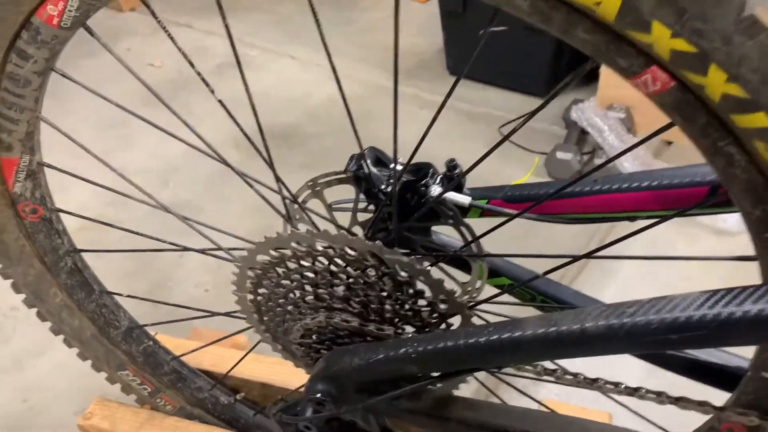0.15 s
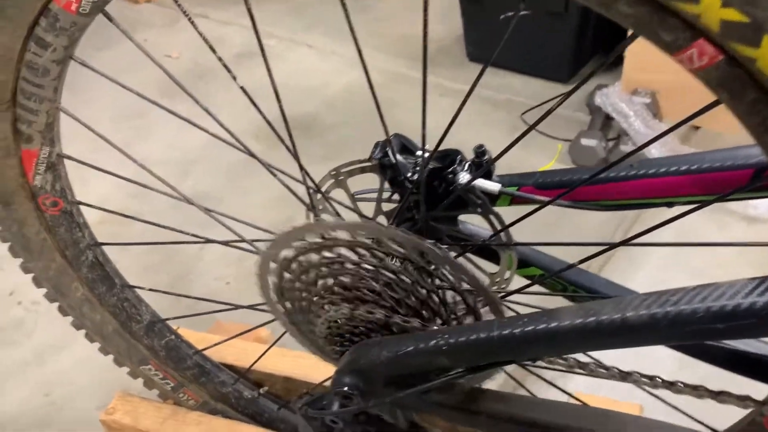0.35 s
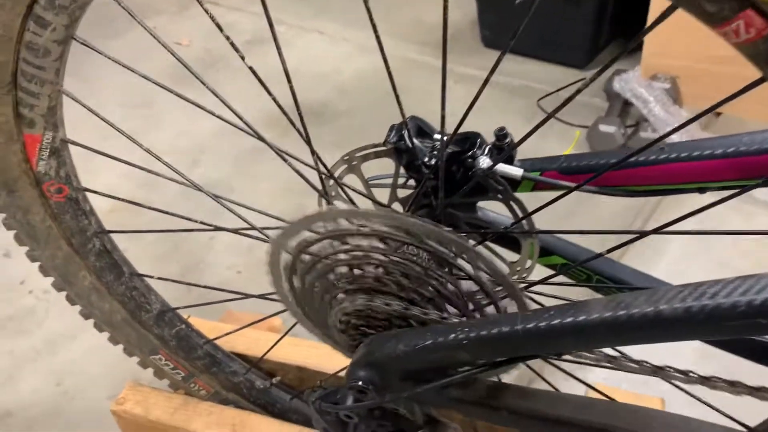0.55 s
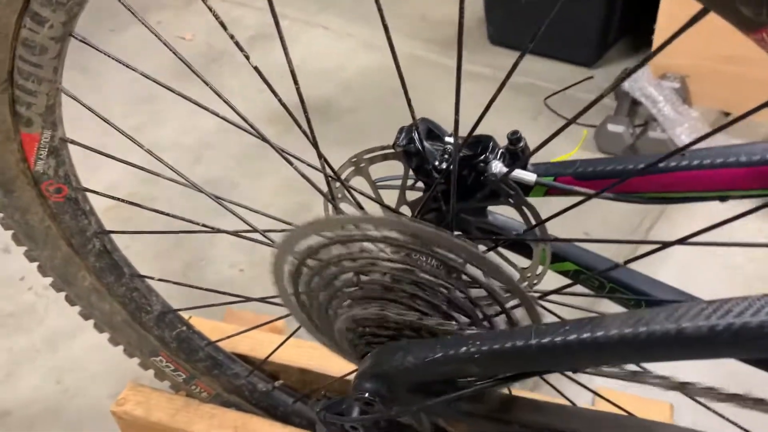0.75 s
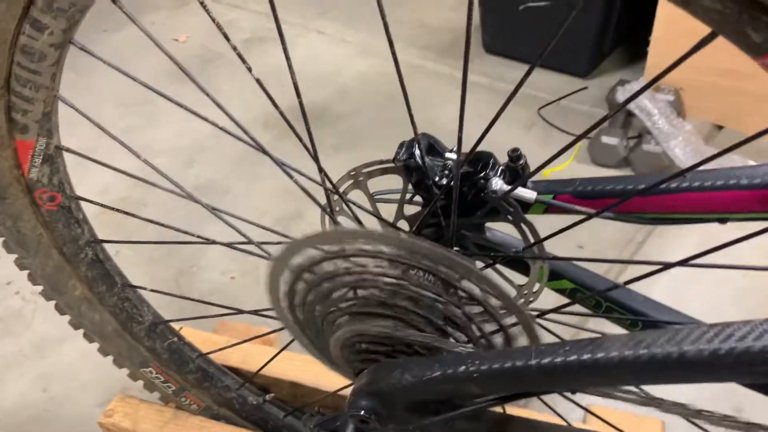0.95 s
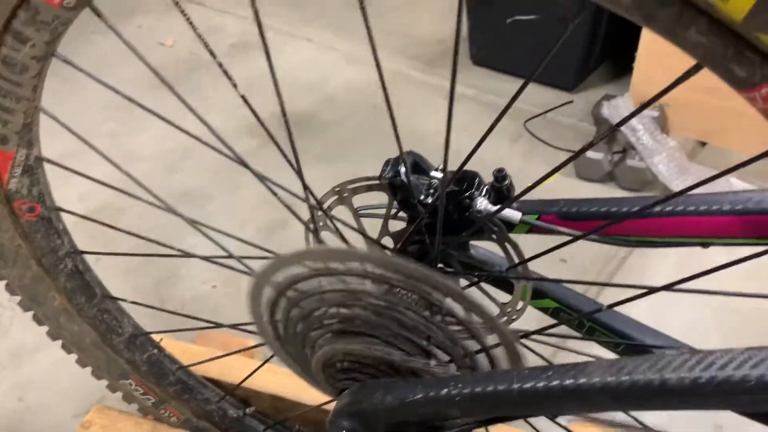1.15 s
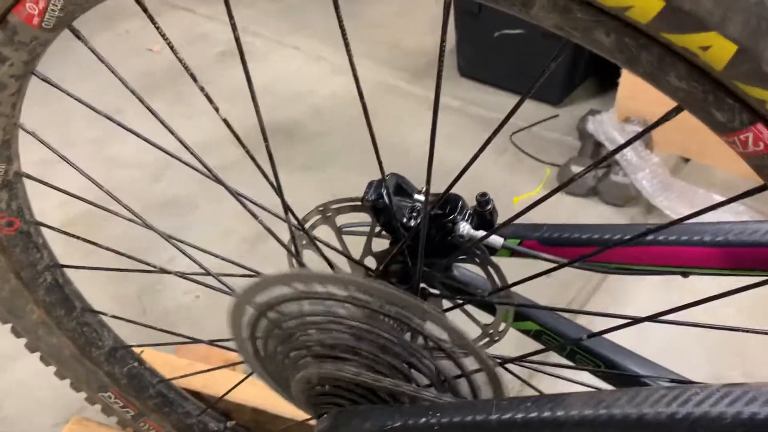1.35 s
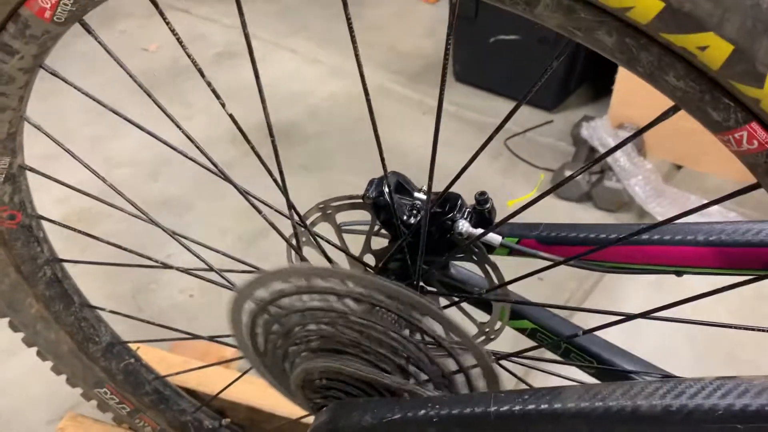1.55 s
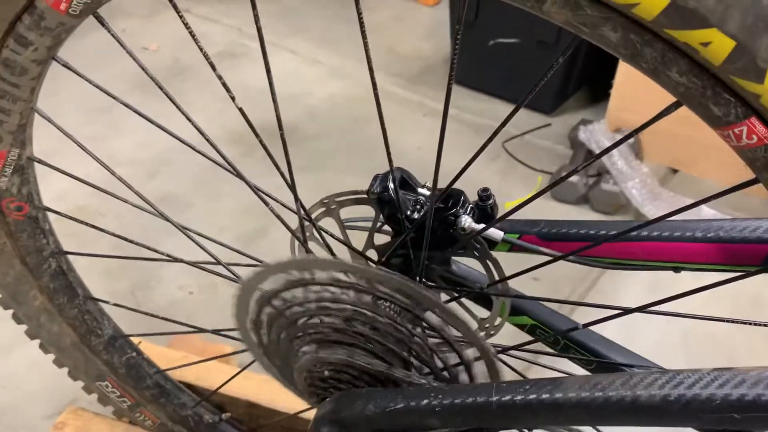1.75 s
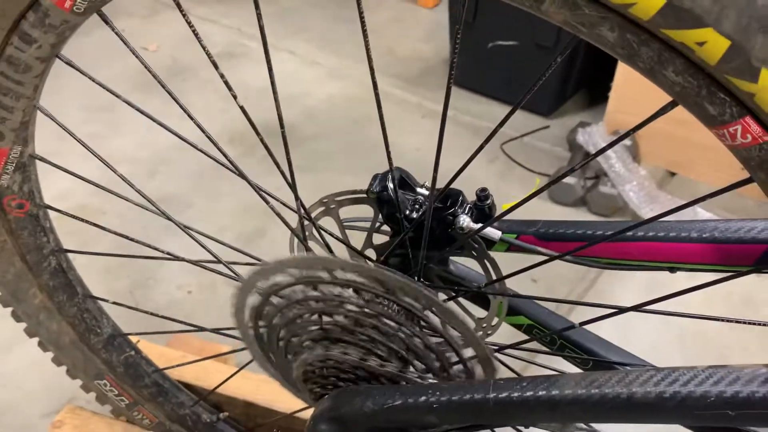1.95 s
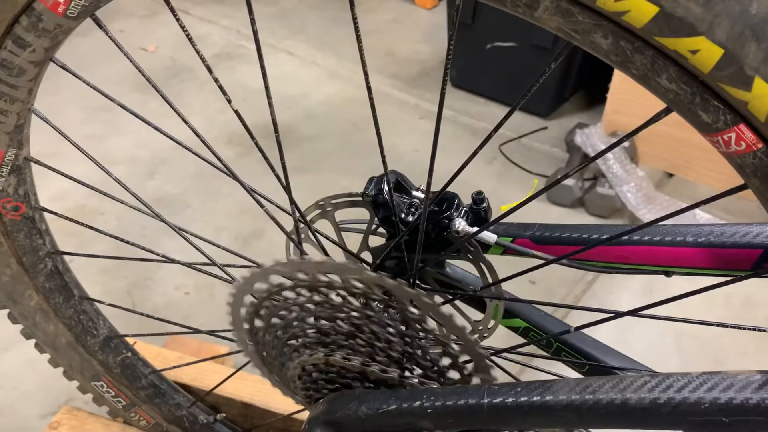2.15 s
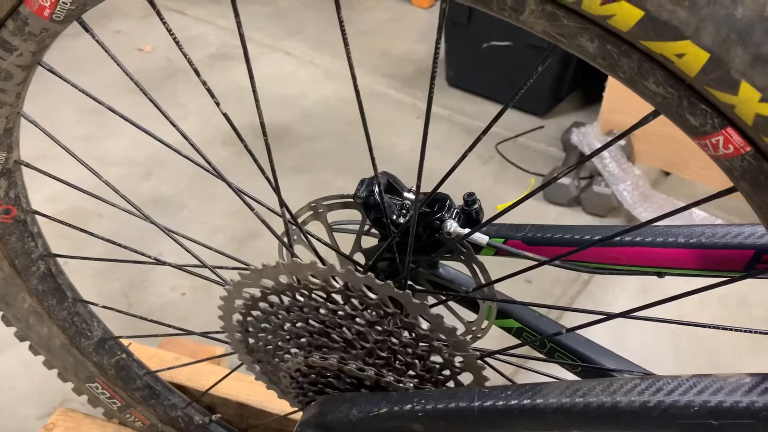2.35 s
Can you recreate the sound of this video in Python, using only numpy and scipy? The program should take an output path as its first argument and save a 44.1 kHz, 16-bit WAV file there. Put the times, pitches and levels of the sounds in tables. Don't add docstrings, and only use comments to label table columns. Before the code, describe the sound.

Close stereo phone pickup of a bike's rear hub: sprung pawls click over ratchet teeth, racing into a ringing metallic whirr while the chain rumbles softly, then slowing click by click over faint workshop room tone.

```python
import sys
import numpy as np
from scipy import signal
from scipy.fft import rfft, irfft, next_fast_len
from scipy.io import wavfile
from scipy.ndimage import uniform_filter1d

SR = 44100
rng = np.random.default_rng(int(sys.argv[2]) if len(sys.argv) > 2 else 0)


def to_wav(sig):
    pcm = np.clip(np.atleast_2d(sig), -1, 1) * 32767
    pcm = np.round(pcm).astype(np.int16)
    wavfile.write(sys.argv[1], SR, pcm.T)


def nominal_scale(level):
    x = np.asarray(level, float) / 20
    return 10 ** x


N = 105840
T = np.arange(N) / SR
SIZE = next_fast_len(N + SR)
HZ = np.arange(SIZE // 2 + 1) * SR / SIZE + 1e-3
LEFT_RIGHT = np.array([[.5], [-.5]])

# pitch_hz, level_db (per Hz)
ROOM_EARLY = [(24, -54), (40, -12), (276, -11), (351, -17.5), (701, -6.5), (1540, -22), (2000, -3),
              (2540, -17.5), (3500, -24), (12000, -44), (15600, -98), (22000, -120)]
# pitch_hz, level_db (per Hz)
ROOM_LATE = [(24, -25.5), (40, -3), (135, -22), (172, -19), (425, -5), (1160, -26.5), (2100, -9),
             (2700, -27), (3800, -17), (4200, -26), (12000, -56.5), (15600, -81.5), (22000, -120)]
# pitch_hz, early_level_db, late_level_db
MAINS_HUM = [
    (58.7, -60.5, -66),
    (109.6, -68, -68.5),
    (683, -82, -85.5),
]
# time_s, level_db
CHAIN_PULL = [(0.1, -66.5), (0.23, -61.5), (0.37, -70), (0.41, -53.5), (0.49, -61), (0.54, -52.5),
              (0.58, -62.5), (0.79, -54), (0.81, -48), (0.85, -50), (1.02, -44.5), (1.43, -48), (1.45, -50),
              (1.53, -51), (1.56, -51.5), (2.15, -74)]
# pitch_hz, width_hz, level_db
FRAME_MODES = [
    (59.3, 28, -6.5),
    (128.6, 22, -7.5),
    (166.9, 15.5, -4.5),
    (229, 57, -10.5),
    (318.5, 117, -7),
    (497, 240, -5.5),
    (798, 200, -6.5),
    (1300, 290, -5.5),
]
# start_s, level_db (against the buzz's start)
STARTING_TICKS = [(0.0907, -11), (0.096, -10.5), (0.138, -4.5), (0.1623, -5), (0.179, -3), (0.1967, -1),
                  (.2072, 2.5), (0.22, -6.5), (0.2286, 3.5), (0.2385, -3.5), (0.2478, 0.5)]
# start_s, level_db (against the buzz's end)
STOPPING_TICKS = [(1.9552, -3), (1.963, -3), (1.9695, 0), (1.977, 0.5), (1.986, -3), (1.9925, 0.5),
                  (2.0038, -3), (2.012, 1), (2.0241, -4.5), (2.0315, 0.5), (2.0426, -2), (2.0544, 0.5),
                  (2.0686, -2.5), (2.0811, -3.5), (2.095, -2), (2.1112, -1.5), (2.131, -6.5), (2.1551, -4),
                  (2.1863, -5.5)]
# time_s, speed_teeth_per_s
TOOTH_SPEED = [(.22, 96), (.36, 200), (.49, 214), (.55, 238), (.61, 288), (.67, 265), (.765, 308),
               (.9, 356), (1.0, 920), (1.12, 775), (1.19, 708), (1.23, 642), (1.3, 600), (1.37, 550),
               (1.43, 502), (1.6, 385), (1.732, 288), (2.045, 88)]
# time_s, level_db
BUZZ_LEVEL = [(0.22, -30.5), (.45, -26), (0.632, -24), (0.852, -23.5), (0.988, -19.5), (1.01, -22.5),
              (1.2, -22.5), (1.24, -22), (1.38, -23.5), (1.43, -21.5), (1.455, -24.5), (1.6, -26),
              (1.922, -30), (2.05, -34)]
# pitch_hz, level_db
SNAP_COLOUR = [
    (1500, -39),
    (2600, -14),
    (3800, -11.5),
    (5800, -14.5),
    (8000, -1.5),
    (10000, -7),
    (12500, -6),
    (15500, -4.5),
]
# pitch_hz, level_db, t60_s
WHEEL_RING = [(296, -56, .3), (650, -24.5, 0.27), (900, -16, 0.74), (1310, -26, 0.12), (1650, -21.5, 0.13),
              (1940, -18, 0.29), (2246, -8, 0.55), (2700, -4.5, 0.23), (2915, -10.5, 0.52),
              (3385, -24, 0.19), (3920, -13, .2), (4290, -13.5, 0.17), (6550, -20.5, 0.28),
              (8180, -43.5, 0.34), (15600, -59, 0.13)]
# pitch_hz, level_db, t60_s
COG_MODES = [(2214, -8, .12), (2480, -7, .1), (2717, -7, .1), (2600, -6, .04), (3005, -1, .16),
             (4440, -7, .02), (5975, -17, .05), (6750, -4, .03), (7750, 0, .008), (9260, -5, .07),
             (9530, -7, .05), (10550, -1, .008), (11910, -11, .03), (11500, -11, .03), (14600, -13, .03),
             (15430, -7, .05), (10800, -11, .03), (15600, -12, .08), (1993, -15, .1), (3160, -12, .1)]
# pitch_hz, level_db, t60_s
SPOKE_MODES = [(2892, -4, 1.2), (3428, -8, 1.6), (2202, -6, .6), (2110, -6, .4), (1530, -1, .06),
               (750, -12, .15), (900, -12, .12), (1050, -9, .1), (3811, -12, .4), (5975, -17, .4),
               (6720, -9, .3)]

ROOM_EARLY_DB, ROOM_LATE_DB, ROOM_SIDE_DB = -53, -65, -1.5
DUCK_S = 0.42
CHAIN_SIDE_DB, CHAIN_FLICKER_DB, CHAIN_LEFT_DB = -9, 1, -2
BROAD_SLOPE = .8
BUZZ_FROM_S, BUZZ_TO_S = .2565, 1.948
ODD_LATE_TEETH, ODD_DB = .1, -1.5
PAWLS, PAWL_SPREAD_TEETH, PAWL_DB, JITTER_S = 3, .1, 1.5, .000015
SNAP_S, RATTLE_S = .001, .003
BLUR_FROM, BLUR_OVER = 230., 120.
BRIGHTER_DB = 1.46
SNAP_DB, TAIL_T60_S, TAIL_HZ = -0.5, .17, 9500.
COGS_DB, COG_KNOCK_DB = -3, 5
COG_LOW_HZ = 1500.
SPOKES_DB = -17
WHEEL_DB, WHEEL_LEFT_DB, RISE_S = -12.5, 2.5, .002
THUD_DB, THUD_T60_S = 3.5, 0.028
KNOCK_DB, KNOCK_LOW_HZ = 8, 900.
MIC_LAG_S, MIC_TURN_RAD = .000208, 1.9
TOP_HZ, EDGE_HZ, BASS_HZ = 15720, 40., 48


def level(x, db):
    return x * nominal_scale(db) / np.sqrt(np.mean(x ** 2))


def curve(table, at):
    return np.interp(at, *np.array(table).T[:2])


def colour(table):
    rows = np.array(table).T
    return nominal_scale(np.interp(np.log(HZ), np.log(rows[0]), rows[1]))


def through(x, response):
    return irfft(rfft(x, SIZE) * response, SIZE)[..., :N]


def unit(response):
    return response / np.sqrt(np.mean(np.abs(response) ** 2))


def causal(gain):
    cepstrum = irfft(np.log(gain), SIZE)
    cepstrum[1:SIZE // 2] *= 2
    cepstrum[SIZE // 2 + 1:] = 0
    return np.exp(rfft(cepstrum))


def modes(table, phases):
    t, ring = T[:SR], 0
    for (hz, db, t60), phase in zip(table, phases):
        decay = nominal_scale(-60 * t / t60) / np.sqrt(t60)
        ring = ring + nominal_scale(db) * decay * np.cos(2 * np.pi * hz * t + phase)
    return ring


def walk(rate):
    k = int(SR / rate)
    v = uniform_filter1d(uniform_filter1d(rng.standard_normal(N), k), k)
    return v / v.std()


def pair(side_db):
    mid, side = rng.standard_normal((2, N))
    return np.array([mid + nominal_scale(side_db) * side, mid - nominal_scale(side_db) * side])


def workshop():
    duck = np.exp(-(T / DUCK_S) ** 2)
    early = level(through(pair(ROOM_SIDE_DB), colour(ROOM_EARLY)), ROOM_EARLY_DB) * duck
    late = level(through(pair(ROOM_SIDE_DB), colour(ROOM_LATE)), ROOM_LATE_DB)
    hum = 0
    for hz, early_db, late_db in MAINS_HUM:
        strength = (nominal_scale(early_db) * duck + nominal_scale(late_db)) * nominal_scale(1.4 * walk(1.6))
        hum = hum + strength * np.sin(2 * np.pi * hz * T)
    return early + late + hum


def chain():
    pull_db, out = curve(CHAIN_PULL, T), 0
    extra_db = BROAD_SLOPE * (pull_db - pull_db.max())
    for hz, width, db in FRAME_MODES:
        resonance = 1 / (1 + 1j * (HZ - hz * hz / HZ) / width) ** 2
        band = level(through(pair(CHAIN_SIDE_DB), resonance), db)
        out = out + band * nominal_scale(CHAIN_FLICKER_DB * walk(12) + (width > 60) * extra_db)
    return level(out, 0) * nominal_scale(pull_db + CHAIN_LEFT_DB * LEFT_RIGHT)


def wheel_ring():
    pitch_hz, _, t60_s = np.array(WHEEL_RING).T
    t, out = T[:SR], 0
    noise = rfft(rng.standard_normal((2, SR)), SIZE)
    thud = nominal_scale(THUD_DB - 60 * t / THUD_T60_S) / np.sqrt(THUD_T60_S)
    for hz in 250 * 2 ** (np.arange(13) / 2):
        t60 = np.interp(np.log(hz), np.log(pitch_hz), t60_s)
        band = irfft(noise * np.maximum(1 - np.abs(2 * np.log2(HZ / hz)), 0), SIZE)[:, :SR]
        out = out + band * (nominal_scale(-60 * t / t60) / np.sqrt(t60) + thud)
    rising = out * (1 - np.exp(-t / RISE_S))
    return unit(rfft(rising, SIZE) * causal(colour(WHEEL_RING)))


def teeth():
    span = T[(T >= BUZZ_FROM_S) & (T <= BUZZ_TO_S)]
    angle = np.cumsum(curve(TOOTH_SPEED, span)) / SR
    slack = np.cumsum(np.exp(-((span - .97) / .05) ** 2))
    angle += (np.round(angle[-1]) - angle[-1]) * slack / slack[-1]
    tooth = np.arange(np.round(angle[-1]) + 1)
    odd = tooth % 2
    at = np.interp(tooth + ODD_LATE_TEETH * odd, angle, span)
    size = nominal_scale(curve(BUZZ_LEVEL, at) + ODD_DB * odd) / np.sqrt(curve(TOOTH_SPEED, at))
    lone_at, lone_db = np.array(STARTING_TICKS + STOPPING_TICKS).T
    lone_size = nominal_scale(lone_db + curve(BUZZ_LEVEL, lone_at)) / np.sqrt(curve(TOOTH_SPEED, lone_at))
    at, size = np.r_[lone_at, at], np.r_[lone_size, size]
    return at, size, 1 / np.maximum(curve(TOOTH_SPEED, at), 40)


def pawls():
    at, size, period = teeth()
    chance = rng.standard_normal((1200, 2 * PAWLS))[:len(at)]
    delay = period[:, None] * PAWL_SPREAD_TEETH * np.arange(PAWLS) + JITTER_S * chance[:, :PAWLS]
    when = SR * (at[:, None] + delay)
    size = size[:, None] * nominal_scale(PAWL_DB * chance[:, PAWLS:]) * np.sqrt(SR / PAWLS)
    whole, knocks, hits = when.astype(int), np.zeros((2, N)), np.zeros(N)

    lead, part = size[:, 0] * np.sqrt(PAWLS), (when - whole)[:, 0]
    which = np.argsort(np.argsort(at)) % 2
    np.add.at(knocks, (which, whole[:, 0]), lead * (1 - part))
    np.add.at(knocks, (which, whole[:, 0] + 1), lead * part)

    np.add.at(hits, whole.ravel(), size.ravel() ** 2)
    t = T[:1024]
    shape = np.exp(-2 * t / SNAP_S) / SNAP_S + np.exp(-2 * t / RATTLE_S) / RATTLE_S
    power = signal.fftconvolve(hits, shape / shape.sum())[:N]
    blur = .85 * np.clip((curve(TOOTH_SPEED, T) - BLUR_FROM) / BLUR_OVER, 0, 1)
    power = (1 - blur) * power + blur * uniform_filter1d(power, size=180)
    rattle = np.sqrt(np.maximum(power, 0)) * rng.standard_normal(N)
    return knocks, rattle


def hub():
    lag = np.exp(-2j * np.pi * HZ * MIC_LAG_S + 1j * MIC_TURN_RAD * np.tanh(HZ / 4000))
    mics = np.array([lag, lag ** 0])
    phases = rng.uniform(0, 2 * np.pi, (4, 32))

    echo = unit(rfft(rng.standard_normal(SR) * nominal_scale(-60 * T[:SR] / TAIL_T60_S), SIZE))
    tail = 1 + echo / (1 + 1j * HZ / TAIL_HZ) ** 2
    direct = nominal_scale(SNAP_DB) * unit(causal(colour(SNAP_COLOUR))) * tail
    no_bass = (1 - 1j * COG_LOW_HZ / HZ) ** 3
    cogs = [nominal_scale(COGS_DB) * unit(rfft(modes(COG_MODES, a), SIZE)) / no_bass for a in phases[:2]]
    spokes = np.array([unit(rfft(modes(SPOKE_MODES, phases[2] + k), SIZE)) for k in (0, 1.8)])
    spokes = nominal_scale(SPOKES_DB) * spokes / (1 + (HZ / 7500) ** 8) / (1 + (600 / HZ) ** 4)

    knocks, rattle = pawls()
    bright = nominal_scale(BRIGHTER_DB * np.log2(curve(TOOTH_SPEED, T) / 300))
    out = through(rattle * bright, (direct + cogs[0]) * mics + spokes)
    lean = nominal_scale(WHEEL_DB + WHEEL_LEFT_DB * LEFT_RIGHT)
    for knock, cog in zip(knocks, cogs):
        push = nominal_scale(KNOCK_DB) * through(knock, 1 / (1 + (KNOCK_LOW_HZ / HZ) ** 2))
        wheel = through((push + rattle / np.sqrt(2)) / bright, lean * wheel_ring())
        both_mics = cog * np.ones((2, 1)) / (1 + (HZ / 3600.) ** 8)
        out = out + wheel + through(nominal_scale(COG_KNOCK_DB) * knock, both_mics)
    return out


def scene():
    return workshop() + chain() + hub()


def low_pass(x):
    return signal.sosfilt(signal.butter(12, 17040, fs=SR, output="sos"), x)


def record(dry):
    treble_cut = (1 - np.tanh((HZ - TOP_HZ) / EDGE_HZ)) / 2
    mix = through(dry, treble_cut / (1 + (BASS_HZ / HZ) ** 4))
    return low_pass(mix)


dry = scene()
out = record(dry)
to_wav(out)
```